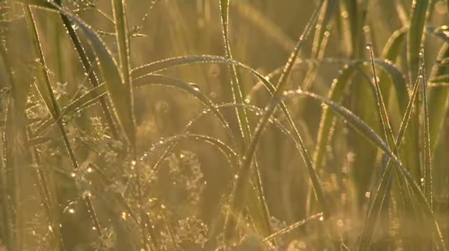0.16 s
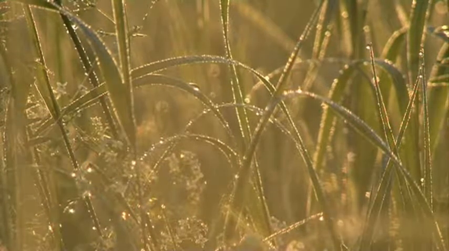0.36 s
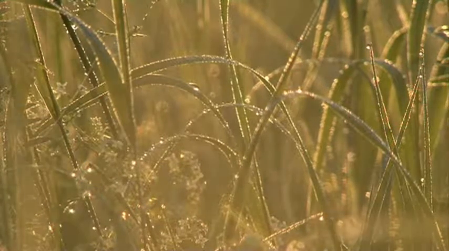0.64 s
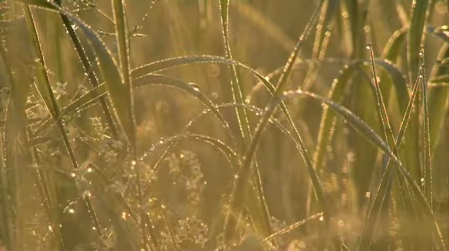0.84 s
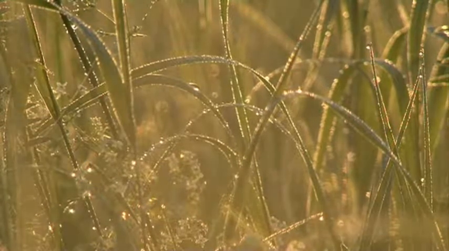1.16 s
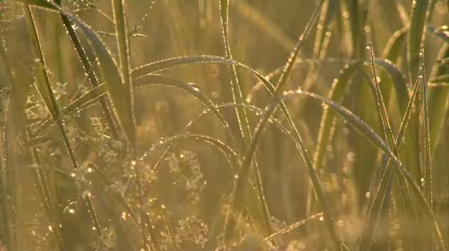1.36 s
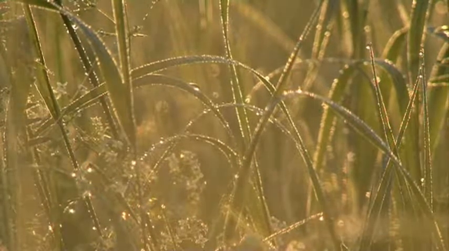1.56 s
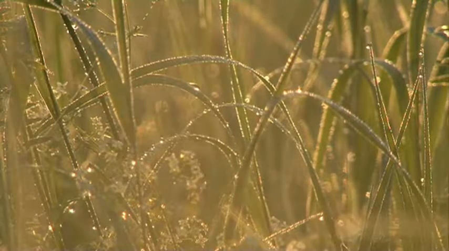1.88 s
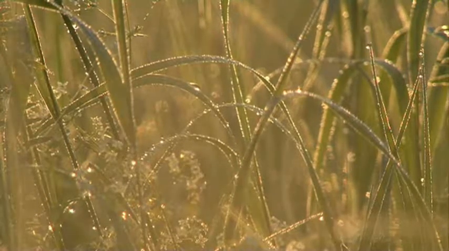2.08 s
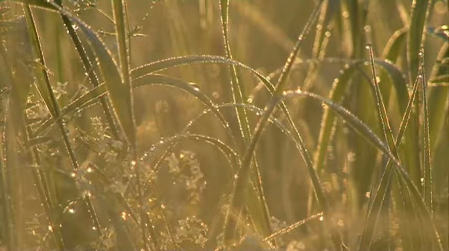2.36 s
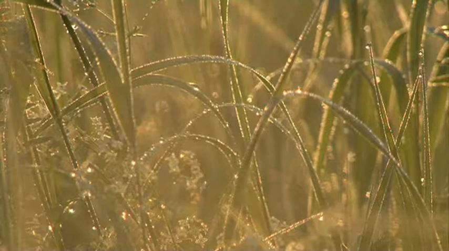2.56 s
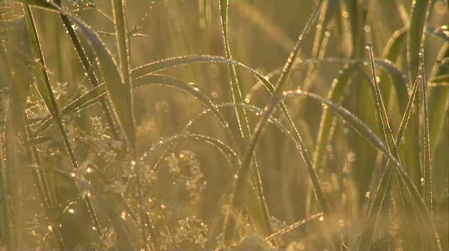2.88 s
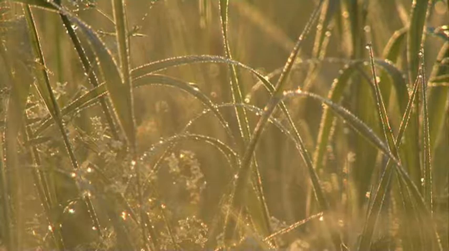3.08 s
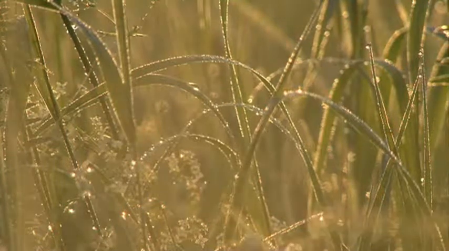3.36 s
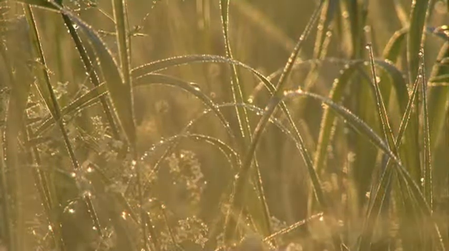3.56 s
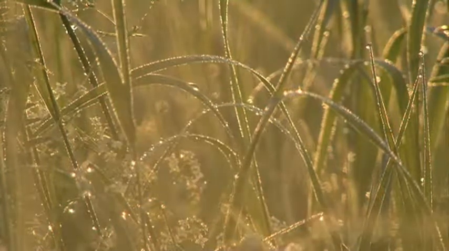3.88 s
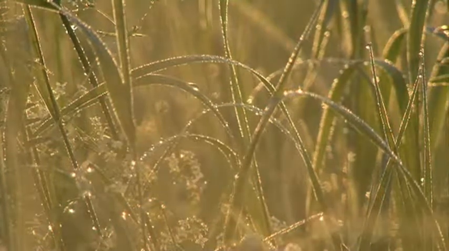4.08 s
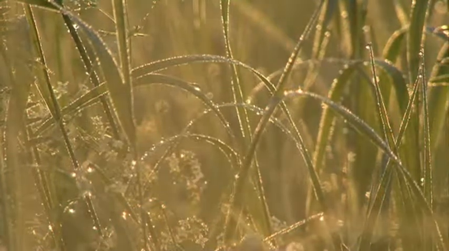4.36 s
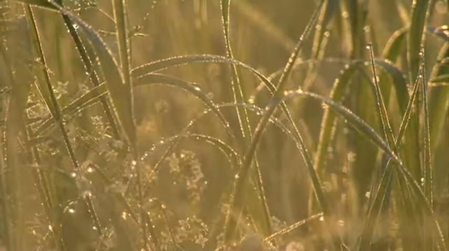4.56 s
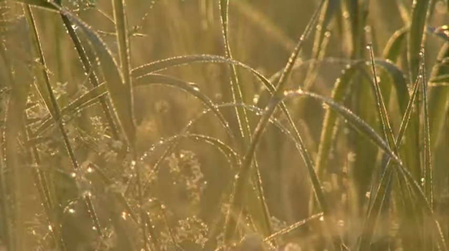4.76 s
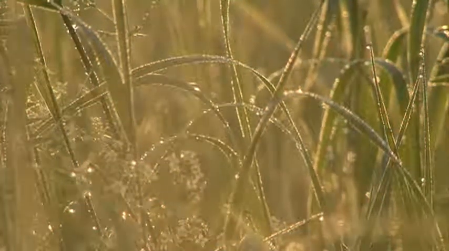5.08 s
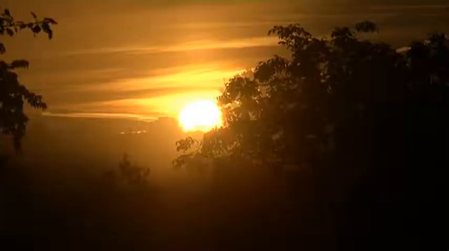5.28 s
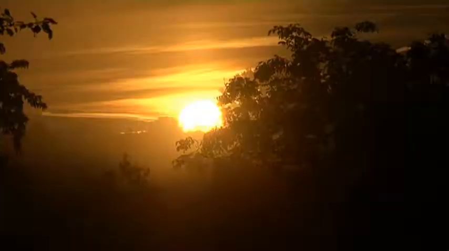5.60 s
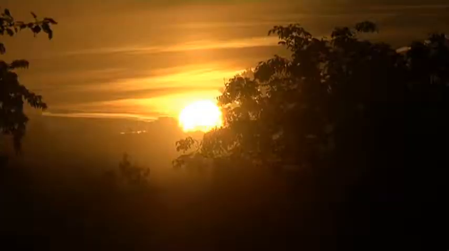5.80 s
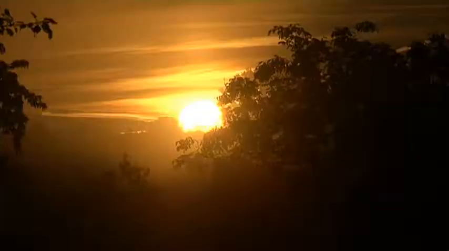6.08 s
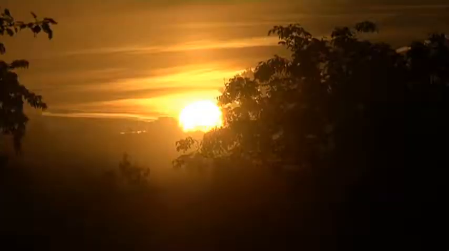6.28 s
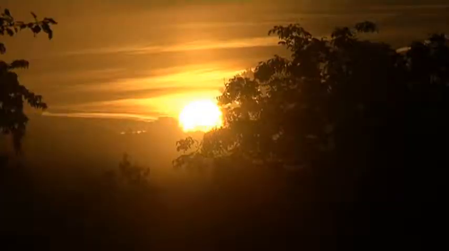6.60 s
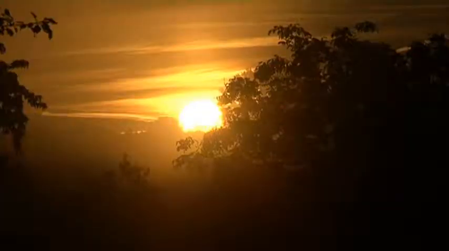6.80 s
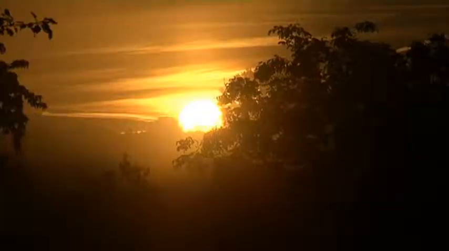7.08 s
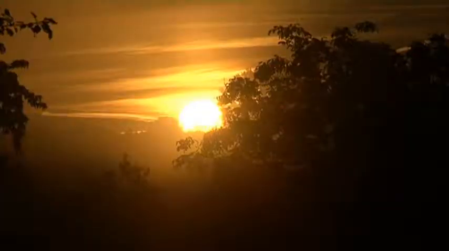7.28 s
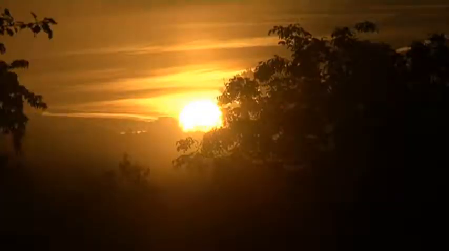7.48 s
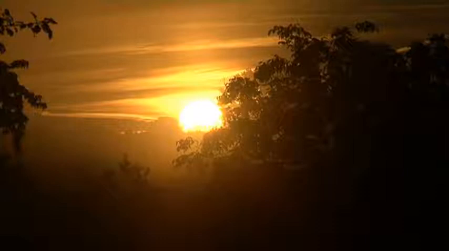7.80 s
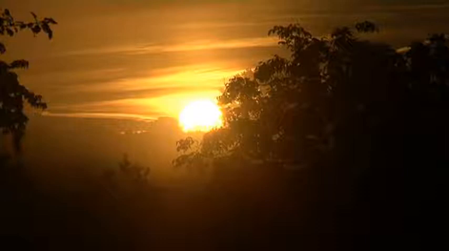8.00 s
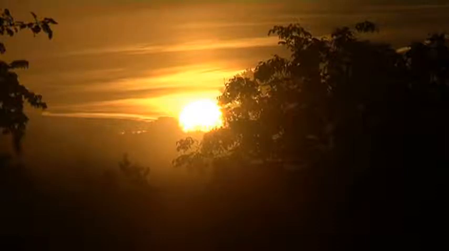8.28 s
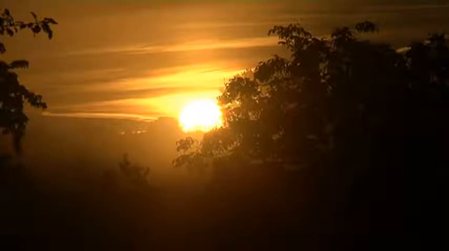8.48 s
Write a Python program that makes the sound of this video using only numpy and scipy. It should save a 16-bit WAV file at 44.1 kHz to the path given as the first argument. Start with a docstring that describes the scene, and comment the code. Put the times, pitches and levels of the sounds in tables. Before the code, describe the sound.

Quiet dawn meadow: a harsh rattling bird scold, thin clear whistles and dull chucks, soft grass ticks, far road rumble and a slowly rising engine hum.

```python
"""Meadow at dawn: a near bird scolds in rasping two-voiced syllables, others whistle and chuck further off.
Voices are chopped air streams through throat resonances; whistles are fluttering sines; chucks and ticks
are ringing noise puffs. Far traffic rumbles below, one engine slowly gaining speed, over microphone hiss.
Hedges and trees send back soft echoes of the birds; crude sample-rate conversion adds faint whistle twins."""
import sys
import numpy as np
from scipy import signal
from scipy.fft import rfft, irfft, next_fast_len
from scipy.io import wavfile
from scipy.ndimage import map_coordinates

SR = 44100
rng = np.random.default_rng(int(sys.argv[2]) if len(sys.argv) > 2 else 0)


def unload_audio(sound):
    """Save the sound as a 16-bit wav file, at the path given as the first command line argument."""
    columns = np.transpose(np.atleast_2d(sound))
    # keep every value between -1 and 1, then stretch to whole-number steps
    steps = np.round(np.clip(columns, -1, 1) * 32767)
    wavfile.write(sys.argv[1], SR, steps.astype(np.int16))


N = 381465


def from_db(db):
    """Decibels to gain."""
    return 10 ** (np.asarray(db) / 20)


def rms_one(x):
    """Scale to unit rms."""
    return x / np.sqrt(np.mean(x ** 2) + 1e-20)


def drift(rate_hz, size=N):
    """Random wander of unit rms: noise through a double one-pole low-pass."""
    pole = np.exp(-2 * np.pi * rate_hz / SR)
    run_in = SR // 2
    noise = rng.standard_normal(size + run_in)
    return rms_one(signal.lfilter([1], [1, -2 * pole, pole * pole], noise)[run_in:])


def resonance(x, hz, width_hz):
    """Two-pole resonance with unit peak gain."""
    r = np.exp(-np.pi * width_hz / SR)
    zeros = (1 - r * r) / 2 * np.array([1, 0, -1])
    poles = [1, -2 * r * np.cos(2 * np.pi * hz / SR), r * r]
    return signal.lfilter(zeros, poles, x)


def coloured(spectrum):
    """Unit-rms noise shaped to a spectrum over log frequency, 80 dB down outside it."""
    hz, db = np.transpose(spectrum)
    size = next_fast_len(N)
    bin_hz = np.maximum(np.arange(size // 2 + 1) * SR / size, 1)
    shape = from_db(np.interp(np.log(bin_hz), np.log(hz), db, left=-80, right=-80))
    return rms_one(irfft(rfft(rng.standard_normal(size)) * shape, size)[:N])


def add(out, start_s, sound):
    """Mix a sound in at a time."""
    i = round(start_s * SR)
    out[i:i + len(sound)] += sound[:N - i]


def phase(hz):
    """Running phase of a pitch track."""
    return 2 * np.pi * np.cumsum(hz) / SR


def scolding():
    """Both halves of the syrinx chop one air stream, so sums and differences of the two pitches sound."""
    # syllables: (time [s], length [s], low voice [Hz], high voice [Hz], crest place [0-1], level [dB])
    # voices are listed at full pitch, ahead of the glide
    rasps = [(0.243, 0.056, 1900, 2380, 0.6, -58.5), (0.314, 0.049, 1856, 2360, 0.35, -60),
             (0.383, 0.049, 1790, 2480, .65, -61), (0.459, 0.042, 1810, 2450, .68, -61.5),
             (0.537, 0.042, 1800, 2400, .6, -60.5), (0.608, 0.039, 1953, 2300, .8, -58),
             (0.686, 0.05, 1810, 2300, .7, -61), (0.777, 0.04, 1750, 2250, .8, -60.5),
             (3.057, 0.045, 1698, 2170, .45, -54), (3.098, 0.028, 1830, 2180, 0.58, -51),
             (3.146, 0.029, 1820, 2210, 0.62, -51), (3.192, 0.032, 1885, 2246, 0.64, -49.5),
             (3.239, 0.032, 1873, 2235, 0.52, -51), (3.288, 0.035, 1880, 2230, .59, -50.5),
             (3.34, 0.03, 1877, 2175, 0.66, -51), (3.391, 0.033, 1827, 2176, .7, -51.5),
             (3.444, .037, 1876, 2195, .65, -51), (3.5, 0.033, 2024, 2330, 0.85, -49),
             (3.556, 0.048, 1938, 2300, .88, -50), (3.624, 0.049, 1915, 2260, 0.83, -49.5),
             (3.696, 0.054, 1980, 2280, 0.7, -49), (3.791, 0.065, 2060, 2410, 0.75, -49),
             (3.901, 0.07, 1976, 2475, 0.69, -48.5), (4.018, 0.068, 2016, 2570, 0.68, -48),
             (4.14, 0.072, 2074, 2692, 0.46, -47)]
    # throat resonances at the mean voice pitch below:
    # (centre [Hz], width [Hz], level [dB], extra at the start [dB], share of breath [1])
    throat = [(2200, 2000, -12.5, 7, .2), (4100, 1400, 1.5, 1.5, 0.23), (5800, 1360, -5, 13, 1.26),
              (8100, 1900, -13, 2, 0.92)]
    throat_listed_at_hz = 2130
    grip_per_spread, grip_from_ratio, grip_most = 12.0, 1.1, 2.2   # wider pitch ratio, harder high voice
    rough_s, quiet_rough_per_db, loud_db = .013, .01, -48   # short and quiet syllables are rougher
    quiet_dull_db = .3   # lost per dB of quietness, except in the main resonance
    breath_db = -3.5   # air noise that leaks with every pulse
    start_pitch_share = .75
    out = np.zeros(N)
    for start_s, length_s, low_hz, high_hz, crest, level_db in rasps:
        size = round(length_s * SR)
        u = np.arange(size) / size
        crest = np.clip(crest, .2, .9)
        steady = np.ones(size)
        quiet_db = loud_db - level_db
        grip = np.clip(grip_per_spread * (high_hz / low_hz - grip_from_ratio), .3, grip_most)
        rough = rough_s / length_s + quiet_rough_per_db * quiet_db

        # shaky cycles blur the lines
        low = np.cos(phase(low_hz * steady) + rough * drift(660, size=size))
        high = np.cos(phase(high_hz * steady) + rough * drift(730, size=size))
        opening = np.exp(2.02 * low + grip * high)
        octaves = low ** 2 + grip / 2.0 * high ** 2   # each half also sounds its own octave
        flow = rms_one(np.diff(opening, prepend=opening[0]))
        flow = flow + 0.32 * rms_one(np.diff(octaves, prepend=octaves[0]))
        breath = from_db(breath_db) * rms_one(opening * rng.standard_normal(size))

        throat_scale = (low_hz + high_hz) / 2 / throat_listed_at_hz
        voiced = 0
        for k, (hz, width_hz, db, early_db, leak) in enumerate(throat):
            colour = resonance(flow + leak * breath, hz * throat_scale, width_hz)
            dull_db = 0 if k == 1 else quiet_dull_db * quiet_db
            voiced = voiced + (-1) ** k * colour * from_db(db + early_db * (1 - u) - dull_db)

        rising = np.maximum(1 - u / crest, 0)
        falling = np.maximum(u - crest, 0) / (1 - crest)
        arch = 1 - (1 - start_pitch_share) * rising ** 1.7
        arch = arch - 0.0084 / length_s * falling ** 3.52   # short syllables drop further
        # reading at varying speed glides voices and throat together
        bent = map_coordinates(voiced, [np.cumsum(np.clip(arch, .4, 1))], order=3)
        swell = (1 - rising ** 1.6) * (1 - falling ** 3.2)
        swell = swell * from_db(1.45 * drift(90, size=size))
        add(out, start_s, from_db(level_db) * rms_one(bent * swell))
    return out


def whistles(notes, bend, soft_start_db, soft_end_db, flutter_db,
             scoop_hz=0, drop_hz=0, edge_s=.008, hold_s=0):
    """Fluttering near-sines: a hold, a glide (bend under 1 moves early), a scoop in, a drop out, one swell."""
    out = np.zeros(N)
    for start_s, length_s, start_hz, end_hz, level_db, crest in notes:
        t = np.arange(0, length_s, 1 / SR)
        u = t / length_s
        crest = np.clip(crest, .05, .95)
        glide = (np.maximum(t - hold_s, 0) / (length_s - hold_s)) ** bend
        hz = start_hz + (end_hz - start_hz) * glide
        hz = hz - scoop_hz * np.maximum(1 - t / edge_s, 0)
        hz = hz - drop_hz * np.maximum(1 - (length_s - t) / edge_s, 0)
        before_db = soft_start_db * (1 - u / crest) ** 2
        after_db = soft_end_db * ((u - crest) / (1 - crest)) ** 2
        swell_db = np.where(u < crest, before_db, after_db)
        edge = np.minimum(np.minimum(t, length_s - t) / 0.0025, 1)
        tone = np.sqrt(2) * np.sin(phase(hz) + 0.49 * drift(150, size=len(t)))
        gain = from_db(level_db + swell_db + flutter_db * drift(63, size=len(t)))
        add(out, start_s, edge * tone * gain)
    return out


def bursts(rows, decay_s, width_hz):
    """Short puffs of noise ringing round a pitch."""
    out = np.zeros(N)
    t = np.arange(SR // 16) / SR
    for start_s, peak_db, hz in rows:
        puff = rng.standard_normal(len(t)) * t * np.exp(-t / decay_s)
        puff = resonance(resonance(puff, hz, width_hz), hz, width_hz)
        add(out, start_s, from_db(peak_db) * puff / np.abs(puff).max())
    return out


def open_perch_birds():
    """Level pipes, two-part calls and dull chucks: gliding sines and ringing puffs."""
    # whistle columns: (time [s], length [s], start pitch [Hz], end pitch [Hz],
    # level at the crest [dB], crest place [0-1])
    pipes = [(6.7, 0.073, 4230, 4280, -52.5, .65), (6.927, .074, 4180, 4280, -51, 0.75),
             (7.535, .077, 4180, 4230, -63.5, 0.8), (7.795, 0.094, 4190, 4250, -68, .45)]     # scoop up into pitch
    held = [(3.422, .095, 4960, 4710, -44.5, 0.68), (3.695, 0.071, 5020, 4820, -47, 0.41)]       # first part of a call, a held note
    flicks = [(3.53, .052, 3450, 2300, -57, .15), (3.803, .04, 3400, 2580, -61, .1)]   # second part, a low falling flick
    # a far bird's chucks: (time [s], peak [dB], pitch [Hz])
    chucks = [(2.1897, -55, 1710), (2.394, -55, 1810), (2.6012, -50.5, 1870), (4.5286, -54, 1766),
              (4.7537, -50, 1755), (4.9299, -49, 1770), (5.149, -55, 1596), (6.7835, -54.5, 1700),
              (6.9507, -53, 1820), (7.1904, -55, 2070), (7.4305, -55, 1730), (7.6168, -53, 1860)]
    out = whistles(pipes, bend=1.3, soft_start_db=-8, soft_end_db=-10, flutter_db=2.5,
                   scoop_hz=750, edge_s=0.0118)
    out += whistles(held, bend=.6, soft_start_db=-10, soft_end_db=-16, flutter_db=3.0)
    out += whistles(flicks, bend=.45, soft_start_db=-1, soft_end_db=-13, flutter_db=4.5)
    return out + bursts(chucks, decay_s=0.0077, width_hz=780)


def tree_birds():
    """High slurs, one long fall, thin seeps and short scratchy chirps: gliding sines and ringing puffs."""
    # whistle columns: (time [s], length [s], start pitch [Hz], end pitch [Hz],
    # level at the crest [dB], crest place [0-1])
    slurs = [(6.768, 0.1, 7700, 7290, -53, 0.49), (6.932, 0.1, 7680, 6800, -52.5, .8),
             (7.097, .068, 6900, 6300, -54.5, 0.82)]   # sag and end in a drop
    long_fall = [(3.008, .29, 7750, 6270, -59, 0.17)]
    seeps = [(0.535, .035, 7540, 7560, -76, .5), (0.7, .026, 6900, 7490, -71, .7),
             (.728, .028, 7000, 7490, -69, .3), (2.635, .07, 8380, 8290, -73, .25),
             (2.67, 0.1, 7140, 6880, -71, .4), (5.175, .045, 7390, 7300, -73, .6),
             (8.342, 0.044, 7700, 8500, -64.5, .2)]   # thin and high
    # short scratchy chirps around the whistles: (time [s], peak [dB], pitch [Hz])
    scratches = [(6.65, -62, 5500), (6.672, -53, 6210), (6.675, -56, 4870), (6.684, -51.5, 3000),
                 (6.9, -55, 5930), (6.912, -54, 4470), (7.162, -51, 5660)]
    out = whistles(slurs, bend=1.4, soft_start_db=-13, soft_end_db=-6, flutter_db=2.0,
                   scoop_hz=700, drop_hz=600, edge_s=0.0089)
    out += whistles(long_fall, bend=.45, soft_start_db=-12, soft_end_db=3.5, flutter_db=2.5, hold_s=0.022)
    out += whistles(seeps, bend=.55, soft_start_db=-9, soft_end_db=-8, flutter_db=2.5)
    return out + bursts(scratches, decay_s=0.009, width_hz=1200)


def meadow(x, trees_db, hedge_db):
    """Direct sound plus a diffuse tail from the trees and a smeared echo off a hedge line."""
    trees_t60_s, hedge_echo_s = 0.44, 0.085
    t = np.arange(SR // 2) / SR
    trees = rng.standard_normal(len(t)) * from_db(-60 * t / trees_t60_s) * np.minimum(t / 0.0027, 1)
    hedge = rng.standard_normal(len(t)) * np.exp(-((t - hedge_echo_s) / .016) ** 2)
    response = from_db(trees_db) * trees / np.linalg.norm(trees)
    response += from_db(hedge_db) * hedge / np.linalg.norm(hedge)
    response[0] = 1
    return signal.fftconvolve(x, response)[:N]


def grass_ticks():
    """Ticks in the grass: very short ringing puffs, the louder ones listed, the fainter at random."""
    # louder ticks: (time [s], peak [dB], pitch [Hz])
    loud = [(1.2471, -54, 3390), (1.6643, -56, 3202), (2.1036, -55, 2750), (2.5192, -56, 2670),
            (4.4074, -56, 2990), (4.7456, -48.5, 2350), (7.3746, -55, 2248), (8.3414, -56, 4150)]
    faint_count = 38
    chance = rng.random((faint_count, 3))
    faint_s = chance[:, 0] * N / SR
    faint_db = -66 + 12.8 * chance[:, 1]
    faint_hz = 2100 + 1500 * chance[:, 2]
    faint = np.transpose([faint_s, faint_db, faint_hz])
    return bursts(loud, decay_s=0.0024, width_hz=1800) + bursts(faint, decay_s=.002, width_hz=1700)


def engine():
    """One engine's firing tone and its second order, wavering in phase."""
    # (time [s], firing rate [Hz], first order level [dB], second order level [dB])
    orders = [(2.5, 36.9, -71, -58), (2.7, 36.14, -76, -57), (3.01, 43.8, -68, -60), (3.77, 41.5, -66, -54),
              (5.12, 48.9, -64, -53), (5.21, 46.5, -61, -61), (5.72, 51.3, -53.5, -54),
              (6.39, 51.17, -54.5, -53.5), (6.78, 53.77, -81, -48.5), (7.11, 55.07, -44.5, -56),
              (7.31, 59.5, -53.5, -54.5), (7.5, 56.34, -67, -53.5), (8.53, 62.6, -50, -56),
              (8.65, 64.3, -72, -53)]
    t = np.arange(N) / SR
    s, hz, first_db, second_db = np.transpose(orders)
    turn = phase(np.interp(t, s, hz)) + 0.41 * drift(2.5)
    first = from_db(np.interp(t, s, first_db, left=-90)) * np.sin(turn)
    second = from_db(np.interp(t, s, second_db, left=-90)) * np.sin(2 * turn)
    return np.sqrt(2) * (first + second)


def drone():
    """A low sine whose pitch and phase waver."""
    # (time [s], level [dB])
    levels = [(0.0, -60), (0.02, -51.5), (0.34, -59.5), (2.36, -62.5), (2.41, -53.5), (3.28, -64.5),
              (4.99, -58), (8.65, -64)]
    centre_hz, waver_hz = 155.5, 3.0
    s, level_db = np.transpose(levels)
    gain = np.sqrt(2) * from_db(np.interp(np.arange(N) / SR, s, level_db))
    return gain * np.sin(phase(centre_hz + waver_hz * drift(1.505)) + 0.58 * drift(3.8))


def traffic():
    """Far traffic: noise shaped as low rumble and as tyre roar."""
    # (time [s], rumble level [dB], tyre roar level [dB])
    levels = [(0, -51, -56), (1.6, -51, -57), (3.1, -51, -57.5), (5.6, -50.5, -58), (7, -49.5, -58),
              (8.65, -50, -58)]
    # noise spectra: (frequency [Hz], relative density [dB per Hz])
    rumble = [(15, -86), (25, -34), (42, -11), (65, 1.5), (102, 2), (161, -2.5), (188, -5), (281, -17),
              (371, -20), (450, -16.5), (580, -31), (990, -120)]
    roar = [(150, -5.5), (250, -0.5), (412, -12.5), (441, -8.5), (519, -3.5), (557, -2.5), (1120, -3.5),
            (1440, -10), (2110, -16.5), (4000, -34), (5200, -48), (8800, -120)]
    t = np.arange(N) / SR
    s, rumble_db, roar_db = np.transpose(levels)
    out = from_db(np.interp(t, s, rumble_db)) * coloured(rumble)
    return out + from_db(np.interp(t, s, roar_db) + 0.35 * drift(11.4)) * coloured(roar)


def microphone_hiss():
    """Steady microphone noise, mostly treble."""
    # (frequency [Hz], relative density [dB])
    spectrum = [(1470, -35), (2500, -3), (3090, -0.5), (8250, -5), (14800, -2.5), (15400, 0)]
    return from_db(-66.5) * coloured(spectrum)


def scene():
    """Birds in the meadow over far traffic."""
    birds = meadow(scolding(), trees_db=-7.0, hedge_db=-18.5)
    birds += meadow(open_perch_birds(), trees_db=-15.5, hedge_db=-25)
    birds += meadow(tree_birds(), trees_db=-8, hedge_db=-15)
    far = engine() + drone() + traffic()
    return (birds + grass_ticks() + far + microphone_hiss())[None]


def record(dry):
    """48 kHz to 44.1 kHz without interpolation: picking samples leaves twins 3.9 kHz away; then a top cut."""
    cutoff_hz = 15680   # stop-band edge
    taken = signal.resample_poly(dry, 160, 147, axis=1)
    picked = taken[:, np.arange(N) * 160 // 147]   # the sample at or just before each instant
    return signal.sosfilt(signal.cheby2(28, 62, cutoff_hz, fs=SR, output="sos"), picked)


dry = scene()
out = record(dry)
unload_audio(out)
```